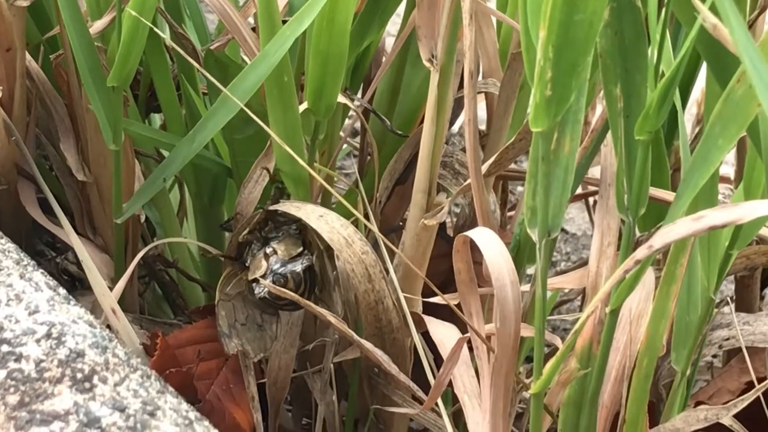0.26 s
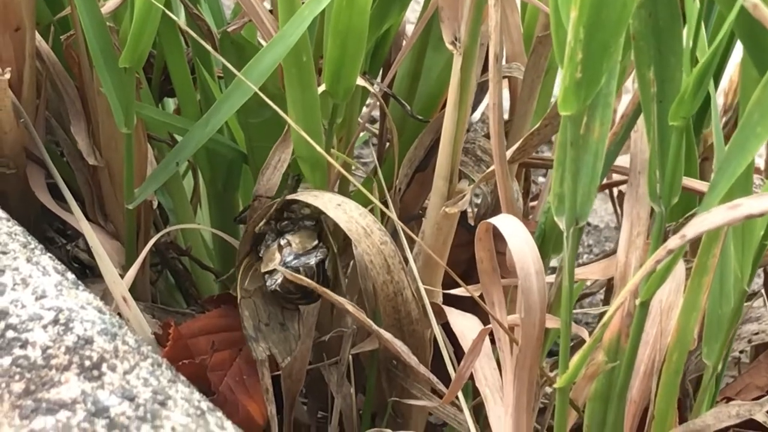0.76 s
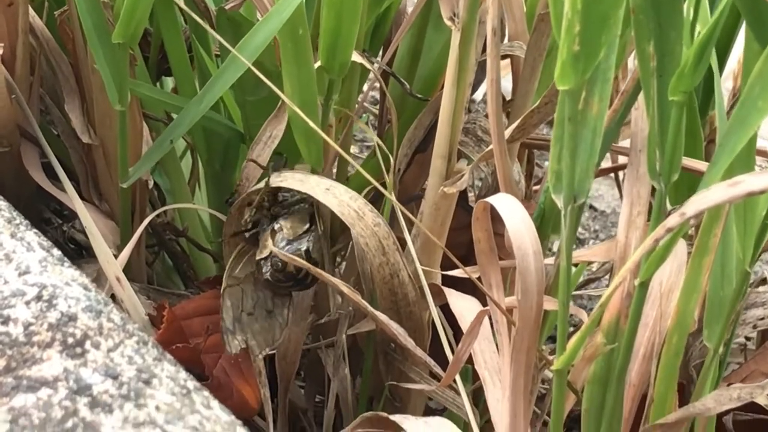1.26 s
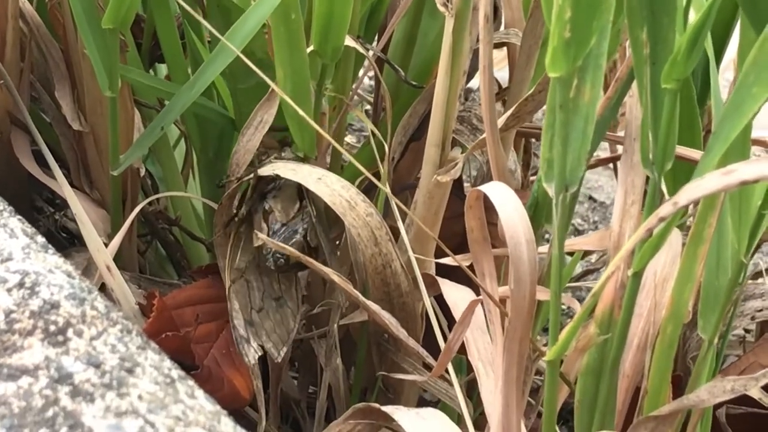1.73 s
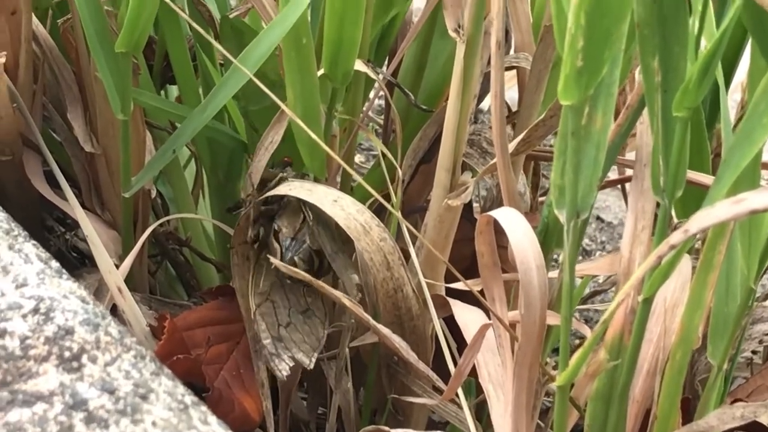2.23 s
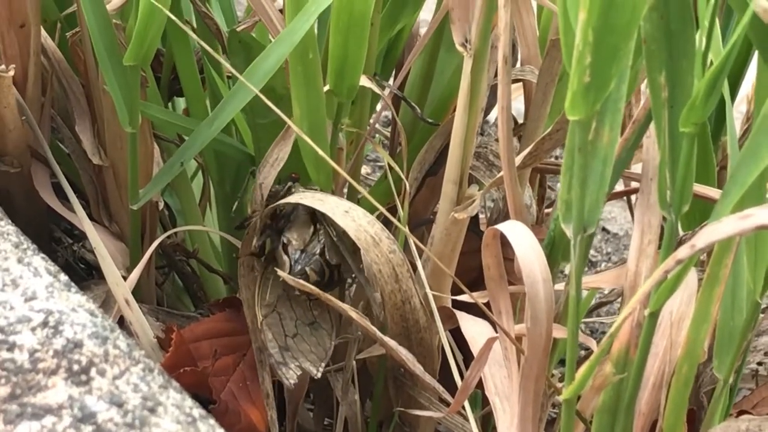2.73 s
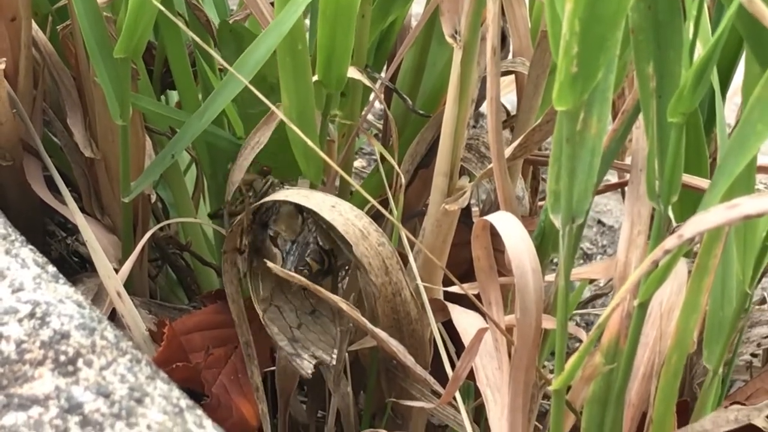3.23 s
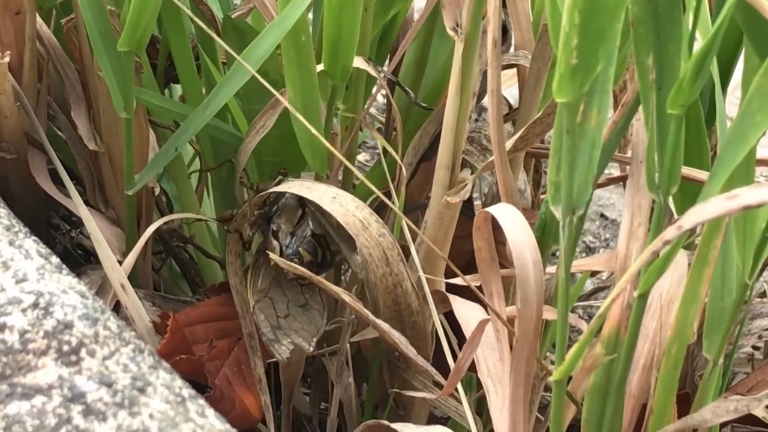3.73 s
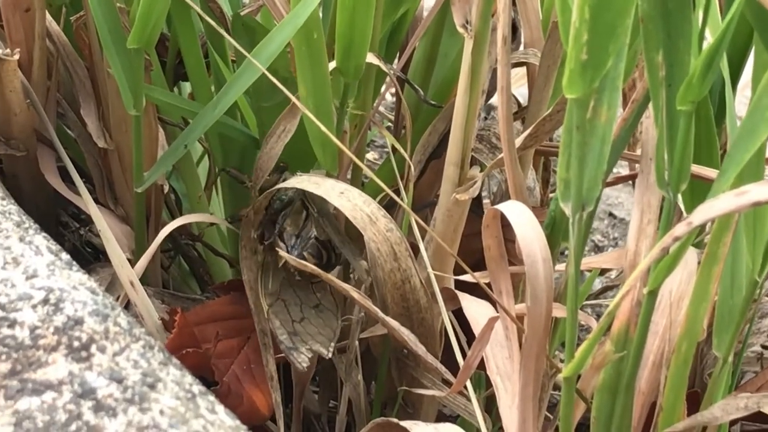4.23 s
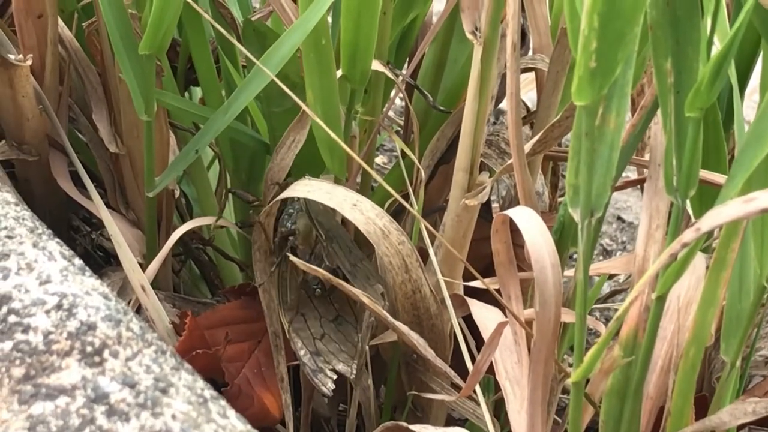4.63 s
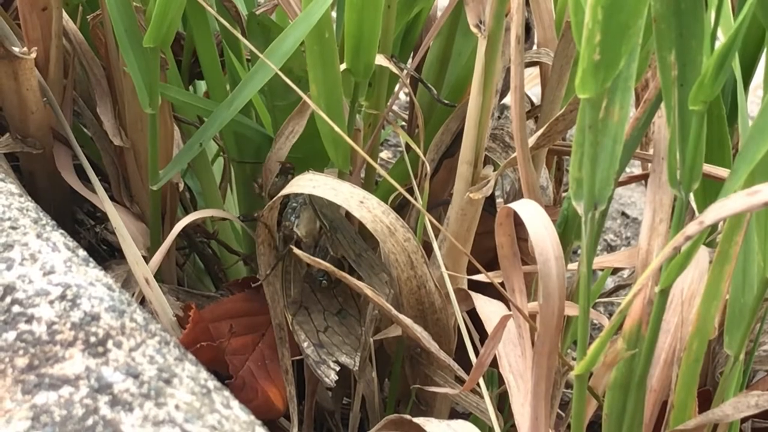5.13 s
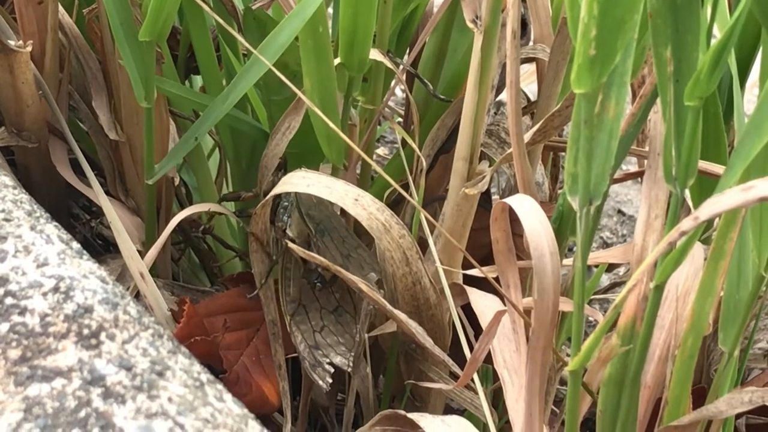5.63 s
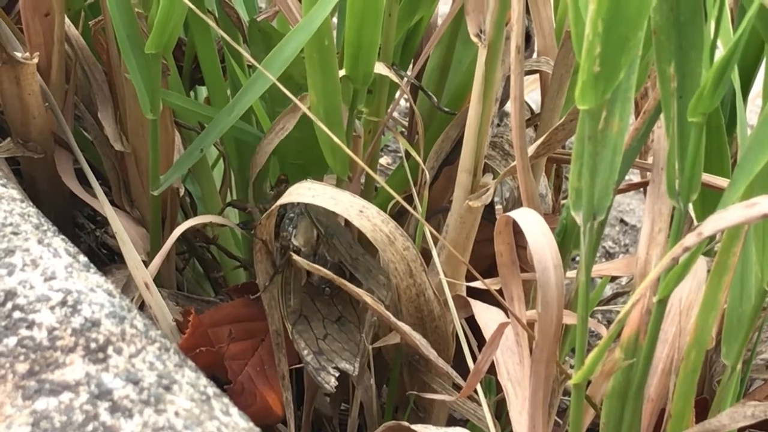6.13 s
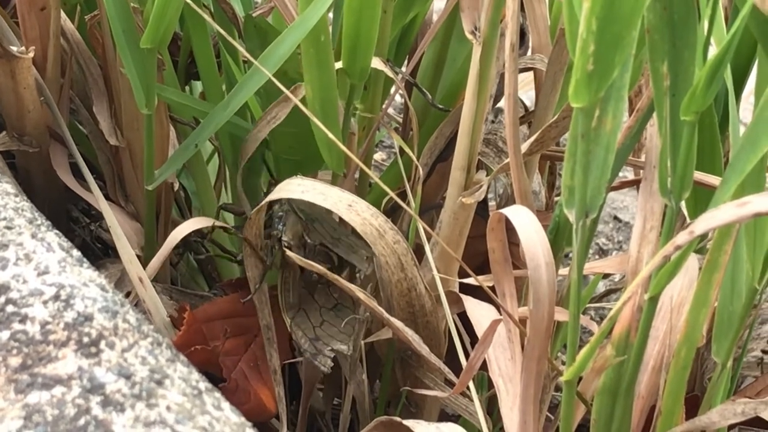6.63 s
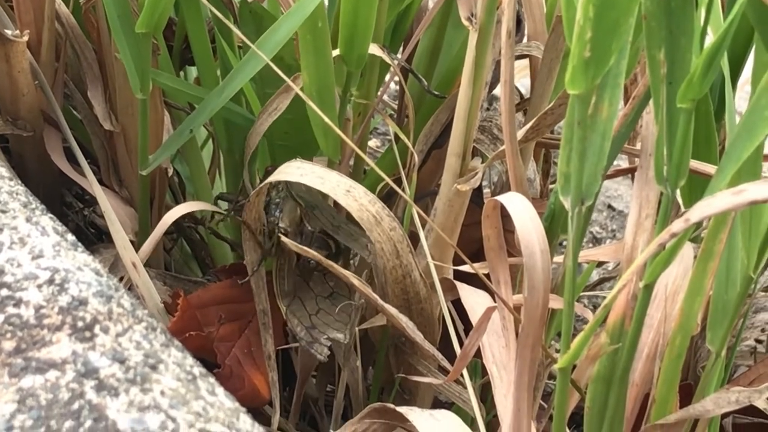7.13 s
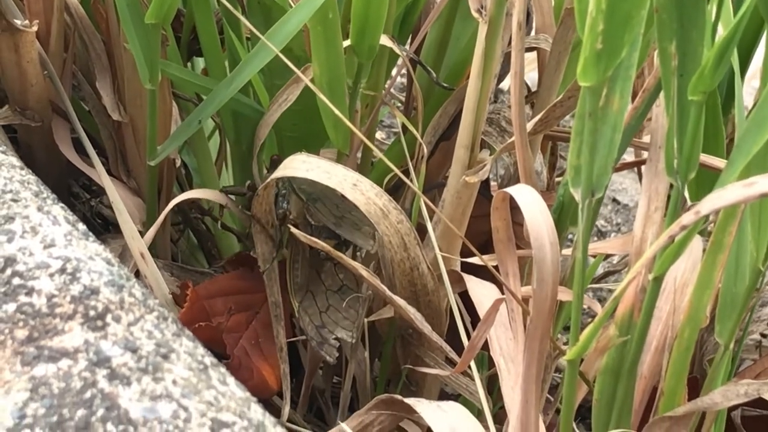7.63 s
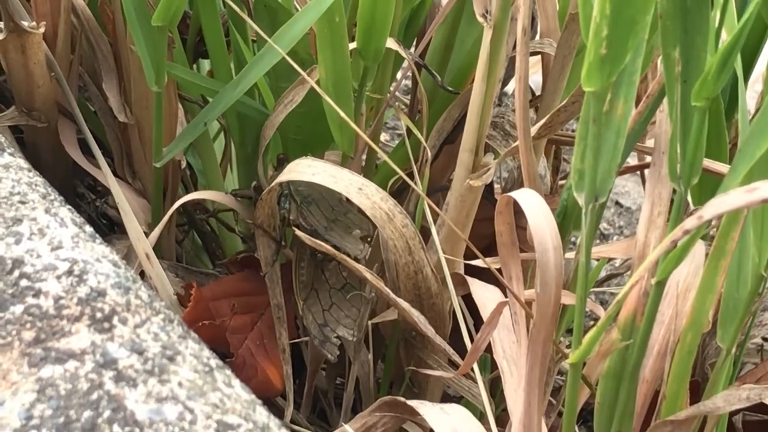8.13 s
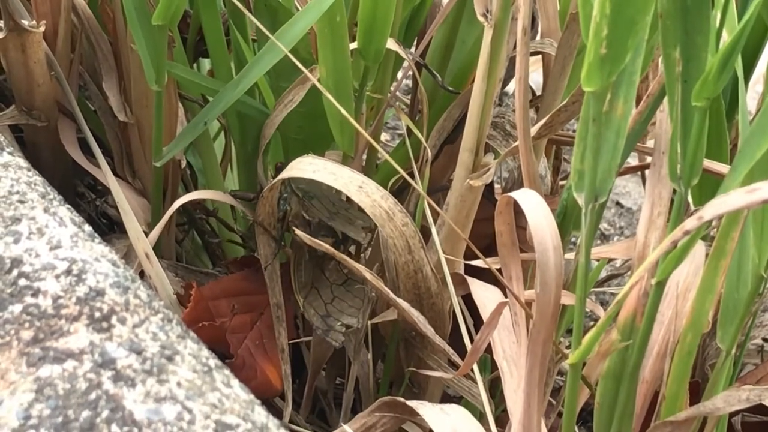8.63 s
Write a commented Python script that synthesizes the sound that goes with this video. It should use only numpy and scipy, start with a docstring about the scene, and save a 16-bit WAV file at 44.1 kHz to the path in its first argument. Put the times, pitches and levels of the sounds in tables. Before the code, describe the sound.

One cicada sings very close to the microphone among roadside grass: a loud, dry, metallic buzz around five to six kilohertz, pulsing about a hundred times a second, with fine hiss on top. It never pauses. A few low wind thumps come in the first half second and one near three. Around four seconds the tone changes as the insect turns. Far traffic hums beneath, and a car passes softly just after six seconds.

```python
"""A bright, rasping cicada song close to the microphone, with low wind bumps near the start and one later.
Far traffic hums behind, and one car passes. The cicada's two ribbed drums buckle in turn about a hundred
times a second, ringing the ribs, an air sac and the shell; a fine hiss follows the effort. Traffic and car
are coloured noise, the engine adds sine tones that fall in pitch as it passes, and wind gives dying swings.
"""
import sys
import numpy as np
from scipy import signal
from scipy.io import wavfile
from scipy.ndimage import uniform_filter1d

SR = 44100
rng = np.random.default_rng(int(sys.argv[2]) if len(sys.argv) > 2 else 0)


def pcm_store(signal):
    """Save signal as 16-bit PCM."""
    levels = np.round(np.clip(np.atleast_2d(signal), -1, 1) * 32767)
    wavfile.write(sys.argv[1], SR, levels.astype(np.int16).T)


N = 391608

# Colour of the far traffic: pitch_hz, level_db (relative, per Hz)
FAR_COLOUR = [(15, -41), (25, -4.5), (54, 1), (104, -7), (140, -18), (165, -11), (229, -10), (336, -13.5),
              (372, -21), (757, -9), (2050, -22.5), (3200, -23), (4160, -28), (7040, -120)]
# Colour of the car's tyres and body: pitch_hz, level_db (relative, per Hz)
CAR_COLOUR = [(15, -40), (25, -10), (38, 1), (64, -2), (136, -7.5), (214, -7), (241, -10.5), (315, -2.5),
              (371, -9), (1290, -11), (1520, -14), (3300, -22), (4290, -23), (7260, -120)]
# Hum of the engine: pitch_hz, level_db (at its nearest), rear_gain_db (added from behind)
ENGINE_TONES = [(55, -41, 4.5), (107.2, -44.5, 0), (215.3, -46.5, 0), (323, -50, 2), (433, -51, 4.5)]
# Wind bumps on the microphone: start_s, level_db, pitch_hz
WIND_BUMPS = [(0.226, -33, 78.5), (0.248, -25, 69), (0.291, -32, 59.2), (0.399, -36, 67.3),
              (0.559, -36, 43.1), (3.17, -36, 56.5)]
# Colour of the fine hiss: pitch_hz, level_db (relative, per Hz)
HISS_COLOUR = [(2500, -90), (3500, -10.5), (4600, 3.5), (6300, 11), (8800, 4.5), (10300, 6), (11300, 3.5),
               (12300, -6.5), (15800, -3)]
# How hard the insect sings: time_s, effort_db
EFFORT_CURVE = [(0, -10), (.6, -12), (1.4, -12), (1.57, -11), (1.75, -12.5), (2.15, -12.5), (2.4, -12),
                (3.3, -12), (3.45, -12), (4.4, -11.5), (5.1, -12), (8.88, -12.1)]
# How far the insect has turned away: time_s, turn (0 facing, 1 away)
TURN_CURVE = [(0, 0.15), (1.5, 0.05), (3, 0), (3.6, 0), (4.2, 0.87), (4.5, 0.93), (6, 0.96), (7.5, 1.03),
              (8.2, 1), (8.88, 1)]
# The muscle drifts about an even beat: time_s, late_ms
LATE_CURVE = [(0, -2.2), (.25, -2.08), (.5, -1.7), (.93, -1.16), (1.03, -1.15), (1.2, -.86), (1.35, -.87),
              (1.5, -1.12), (1.95, -1.23), (2.6, -1.33), (2.85, -1.2), (2.99, -.9), (3.37, -.85),
              (3.85, -.43), (4.37, -.07), (4.56, -.49), (5.3, -.56), (5.7, -.98), (6.25, -1.12),
              (6.55, -1.39), (7.1, -1.41), (7.4, -1.59), (8.15, -1.53), (8.46, -1.16), (8.88, -1.25)]
# Delay of the second drum, held and then slid to a new value: start_s, delay_ms
DRUM_DELAYS = [(0, 1.745), (.97, 1.883), (1.12, 1.775), (1.34, 1.707), (1.51, 1.77), (1.8, 1.68),
               (1.91, 1.755), (2.1, 1.865), (2.97, 1.748), (3.09, 1.865), (3.8, 1.81), (4.0, 1.87),
               (4.21, 1.93), (4.74, 1.86), (5.85, 1.805), (7.45, 1.695), (8.08, 1.81), (8.29, 1.73),
               (8.38, 1.83), (8.47, 1.725), (8.58, 1.67), (8.75, 1.7)]
# Each drum has one row facing and one turned away: first_rib_hz, first_rib_db, second_rib_delay_ms,
# second_rib_hz, second_rib_db, second_ring_t60_ms, air_sac_share (signed), slack_start_ms
FIRST_DRUM_VOICES = [(6310, 9, 0.626, 5260, 3.5, 5.6, 0.17, 1.3),
                     (6220, 6, 0.684, 5980, 5, 3.2, -1.54, 2.02)]
SECOND_DRUM_VOICES = [(6326, 9.26, 0.812, 5140, 1.1, 3.1, 1, 2.07),
                      (6446, 6.04, 0.8274, 5775, 10.95, 7.3, 0.54, 1.277)]
# Shell snaps after a drum buckles: drum (0 first, 1 second), facing_ms, away_ms, wander_ms
SNAP_TIMES = [(0, .02, .02, .004), (1, .02, .02, .004), (0, .9, .9, .03), (1, 1.04, .98, .04),
              (0, 3.65, 3.6, .04), (1, 3.0, 2.94, .02)]
# Strength of each snap: facing_db, away_db, low_modes_db (added below 7000 Hz)
SNAP_LEVELS = [(-2.5, -5, -50), (-1.5, -3, -46), (-15, -33, -33), (-0.5, -0.5, -4), (-20, -18.5, 7),
               (-6.5, -6, -4)]
# Modes of the shell: pitch_hz, level_db, t60_ms, first_swing (sign)
SHELL_MODES = [(4740, -2.5, 7.4, 1), (6250, -1, 6.3, -1), (7940, -7.5, 4.5, 1), (8910, 2.5, 3.4, -1),
               (9763, 1.5, 2.46, 1), (12000, -15, 4.3, 1), (13000, -8.5, 2.3, -1), (14200, -10.5, 3, 1),
               (14700, -5.5, 3.4, -1)]

# Road
FAR_DB = -50
TYRES_S, TYRES_DB = 6.27, -36  # tyre roar at its nearest
EXHAUST_S, EXHAUST_DB = 6.34, -39.5  # engine rumble at its nearest, a little later
SOUND_M_PER_S, CAR_M_PER_S = 343, 19
CAR_NEAREST_M, GRASS_DB_PER_M = 12, 0.14  # closest distance, extra loss along the verge
# Song
STROKES_PER_S = 102.44
HISS_DB = -19.5  # relative to the effort
SECOND_DB, SECOND_STRAY_DB = 1.2, 0.3  # second drum over the first, and its wander
DELAY_STRAY_MS, DELAY_SCATTER_MS = .016, .005  # held wander; stroke to stroke
FREE_T60_MS, CHOKE_T60_MS = 11.8, 1.95  # first rib's own decay; extra damping once the second rib buckles
RISE_MS = .11  # time constant of a drum ring's swell
SAC_HZ, SAC_T60_MS = 4800, 6  # air sac
SNAP_SCATTER = .2  # stroke-to-stroke variation, in parts of the held wander
DIP_HZ, DIP_WIDTH_HZ = 11350, 1000  # centre and width of a narrow treble dip
DEEPER_S = 4.35  # from here the dip deepens
# Microphone
EDGE_HZ = 15880  # top of the band


def gain_of(db):
    """Decibels to an amplitude factor."""
    return 10 ** (np.asarray(db) / 20)


def read(points, hz):
    """Levels of a colour table at the frequencies hz, interpolated over log frequency."""
    f, value = np.transpose(points)
    return np.interp(np.log(hz + 1), np.log(f + 1), value, -150, -150)


def curves(rows, t):
    """The columns of a curve table at the times t."""
    s, *columns = np.transpose(rows)
    return [np.interp(t, s, c) for c in columns]


def noise(points, patchy_db, size=1024):
    """Coloured noise of rms 1: random short-time spectra with drifting loud and soft patches."""
    hz = np.fft.rfftfreq(size, 1 / SR)
    frames = N // (size // 4) + 5
    real, imaginary, patches = rng.standard_normal((frames, len(hz), 3)).T
    patches = uniform_filter1d(patches, size=8, axis=0)  # smooth over frequency
    patches = uniform_filter1d(patches, size=12, axis=1)  # smooth over time
    level_db = read(points, hz)[:, None] + patchy_db * patches / patches.std()
    spectra = (real + 1j * imaginary) * gain_of(level_db)
    x = signal.istft(spectra, nperseg=size, noverlap=size * 3 // 4)[1][:N]
    return x / x.std()


def ring(ms, hz, t60, rise_ms):
    """A struck mode, silent before the blow, then a swelling and dying sine."""
    after = np.maximum(ms, 0)
    decay = gain_of(-60 * after / t60)
    swell = 1 - np.exp(-after / rise_ms)
    return decay * np.sin(2 * np.pi * hz * after / 1000) * swell


def passing(t, nearest_s, nearest_db):
    """Level of a source that drives past: it spreads with distance and the grass swallows more."""
    metres = np.hypot(CAR_NEAREST_M, CAR_M_PER_S * (t - nearest_s))
    spreading_db = 20 * np.log10(metres / CAR_NEAREST_M)
    return nearest_db - spreading_db - GRASS_DB_PER_M * (metres - CAR_NEAREST_M)


def road(t):
    """Steady far traffic and one car that nears and leaves; its hum drops in pitch as it passes."""
    far = gain_of(FAR_DB) * noise(FAR_COLOUR, 1.54)
    roar_db = passing(t, TYRES_S, TYRES_DB)
    rumble_db = passing(t, EXHAUST_S, EXHAUST_DB)
    car = noise(CAR_COLOUR, 2.0)
    rumble = signal.sosfiltfilt(signal.butter(4, 130, fs=SR, output="sos"), car)
    roar = car - rumble
    near = gain_of(roar_db) * roar / roar.std() + gain_of(rumble_db) * rumble / rumble.std()
    along = CAR_M_PER_S * (t - EXHAUST_S)
    behind = along / np.hypot(CAR_NEAREST_M, along)  # -1 nearing, 1 leaving
    doppler = 1 / (1 + behind * CAR_M_PER_S / SOUND_M_PER_S)
    engine_s = np.cumsum(doppler) / SR  # engine time as heard
    hum = sum(gain_of(db + rear_db * behind) * np.sin(2 * np.pi * hz * engine_s)
              for hz, db, rear_db in ENGINE_TONES)
    return far + near + gain_of(rumble_db - EXHAUST_DB) * hum


def bumps(t):
    """Wind pushes the microphone: a few low, quickly dying swings with a firmer front."""
    out = np.zeros(N)
    for s, db, hz in WIND_BUMPS:
        ms = (t - s) * 1000
        body = ring(ms, hz, 116, 1.2)
        front = 0.65 * ring(ms, 2.2 * hz, 43, 1.5)
        out += gain_of(db) * (body + front)
    return out


def hiss(t):
    """A fine, coloured noise whose level follows the effort of the song."""
    return gain_of(curves(EFFORT_CURVE, t)[0] + HISS_DB) * noise(HISS_COLOUR, 3.25, size=256)


def wander(count, strokes):
    """Unit chance, one row a stroke, that holds for some strokes and then jumps."""
    draws, scatter, dice = rng.standard_normal((int(N / SR * STROKES_PER_S), count, 3)).T
    jumps = abs(dice) < 1.25 / strokes  # about one stroke in so many
    held = np.maximum.accumulate(jumps * np.arange(draws.shape[1]), axis=1)
    return (np.take_along_axis(draws, held, axis=1) + 0.04 * scatter).T


def blend(pair, turn):
    """Values between facing and turned away, one column vector each."""
    return [facing + (away - facing) * turn for facing, away in zip(*pair)]


def drum(ms, pair, turn, chance):
    """The first rib sets the drum ringing; the second chokes that ring and starts its own and the air sac."""
    high_hz, high_db, rib_ms, low_hz, low_db, low_t60, sac, slack_ms = blend(pair, turn)
    later = ms - rib_ms - .008 * chance[:, :1]  # time since the second rib buckles
    choke = gain_of(high_db - 60 * np.maximum(later, 0) / CHOKE_T60_MS)
    first = choke * ring(ms, high_hz * (1 + .003 * chance[:, 1:2]), FREE_T60_MS, RISE_MS)
    second = gain_of(low_db + .5 * chance[:, 2:3]) * ring(later, low_hz, low_t60, RISE_MS)
    air_sac = sac * ring(later, SAC_HZ, SAC_T60_MS, RISE_MS)
    # the fully buckled drum weakens the second ring and the air sac
    slack = gain_of(-9 * np.clip((ms - slack_ms) / 0.41, 0, 1))
    return first + slack * (second + air_sac)


def snap(ms, low_db):
    """A sudden jerk rings the short modes of the shell."""
    return sum(np.sign(sense) * gain_of(db + low_db * (hz < 7000)) * ring(ms, hz, t60, 0.031)
               for hz, db, t60, sense in SHELL_MODES)


def radiate(song):
    """The small body sends out little below its rings, and no bass."""
    steep = signal.sosfiltfilt(signal.butter(6, 4300, "high", fs=SR, output="sos"), song)
    shelf = signal.sosfiltfilt(signal.butter(4, 3350, "high", fs=SR, output="sos"), song)
    return steep + gain_of(-12.5) * (shelf - steep)


def cicada():
    """Each muscle stroke buckles both drums in turn and snaps the shell; one row of samples a stroke."""
    chance = wander(count=9 + 2 * len(SNAP_TIMES), strokes=9)
    beat = np.arange(1, len(chance) + 1)[:, None] / STROKES_PER_S
    late_ms = curves(LATE_CURVE, beat)[0]
    effort_db = curves(EFFORT_CURVE, beat)[0]
    turn = curves(TURN_CURVE, beat)[0]

    jump_s, delay_ms = np.transpose(DRUM_DELAYS)
    gap_ms = delay_ms[np.searchsorted(jump_s, beat) - 1] + DELAY_STRAY_MS * chance[:, 7:8]
    gap_ms = uniform_filter1d(gap_ms, size=4, axis=0)  # slide over a few strokes
    gap_ms = gap_ms + DELAY_SCATTER_MS * rng.standard_normal(beat.shape)
    second_db = SECOND_DB + SECOND_STRAY_DB * chance[:, -1:]

    jitter_ms = 0.014 * rng.standard_normal(beat.shape)
    onset = (beat + (late_ms + jitter_ms) / 1000) * SR  # in samples
    at = onset.astype(int) + np.arange(400)
    first_ms = (at - onset) * 1000 / SR
    since = first_ms, first_ms - gap_ms  # time since each drum buckles
    rows = drum(since[0], FIRST_DRUM_VOICES, turn, chance[:, :3])
    rows += gain_of(second_db) * drum(since[1], SECOND_DRUM_VOICES, turn, chance[:, 3:6])

    loose = chance + SNAP_SCATTER * rng.standard_normal(chance.shape)
    for k, (times, levels) in enumerate(zip(SNAP_TIMES, SNAP_LEVELS)):
        side, near_ms, away_ms, stray_ms = times
        near_db, away_db, low_db = levels
        slip = loose[:, 8 + 2 * k:9 + 2 * k]  # chance in timing
        luck = loose[:, 9 + 2 * k:10 + 2 * k]  # chance in strength
        level = gain_of(near_db + (away_db - near_db) * turn + 1.4 * luck)
        ms = near_ms + (away_ms - near_ms) * turn + stray_ms * slip
        rows += level * snap(since[round(side)] - ms, low_db)

    rows *= gain_of(effort_db + 0.65 * chance[:, 6:7])
    song = np.bincount(at.ravel(), rows.ravel(), N + SR)[:N]  # lay the strokes along time
    return radiate(song)


def treble_dip(song, t):
    """A narrow treble dip, deeper from DEEPER_S on."""
    notched = signal.filtfilt(*signal.iirnotch(DIP_HZ, DIP_HZ / DIP_WIDTH_HZ, SR), song)
    depth = .55 + .37 * np.clip((t - DEEPER_S) / .15, 0, 1)
    return song + depth * (notched - song)


def scene():
    """Road and wind behind the song and its hiss."""
    t = np.arange(N) / SR
    background = road(t) + bumps(t)
    song = treble_dip(cicada() + hiss(t), t)
    return (song + background)[None]


def record(dry):
    """The microphone drops the deepest bass; then a steep filter limits the treble."""
    cut = signal.sosfilt(signal.butter(3, 38, "high", fs=SR, output="sos"), dry)
    band_limit = signal.firwin(1535, EDGE_HZ, window=("kaiser", 9), fs=SR)
    return signal.oaconvolve(cut, band_limit[None], "same")


dry = scene()
out = record(dry)
pcm_store(out)
```